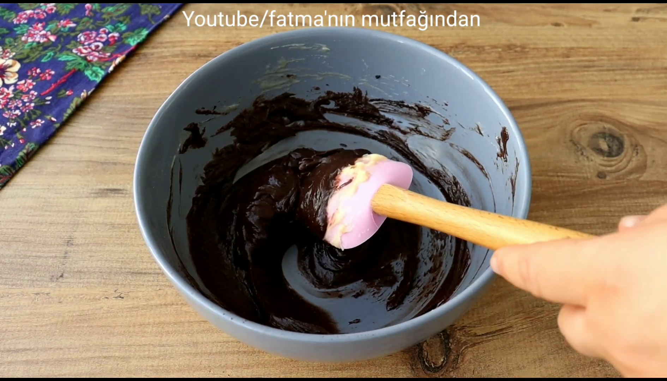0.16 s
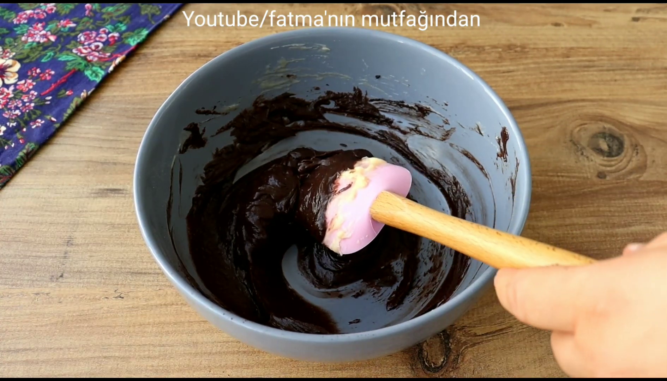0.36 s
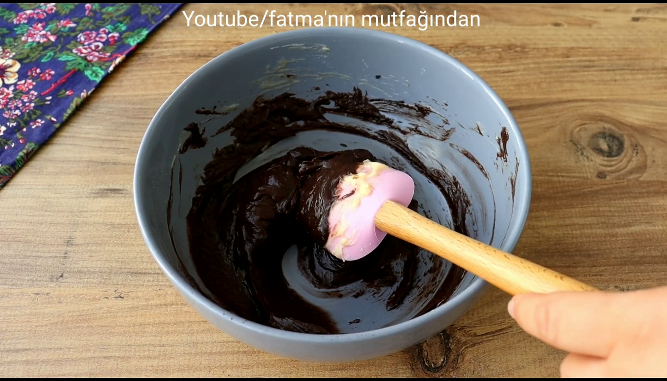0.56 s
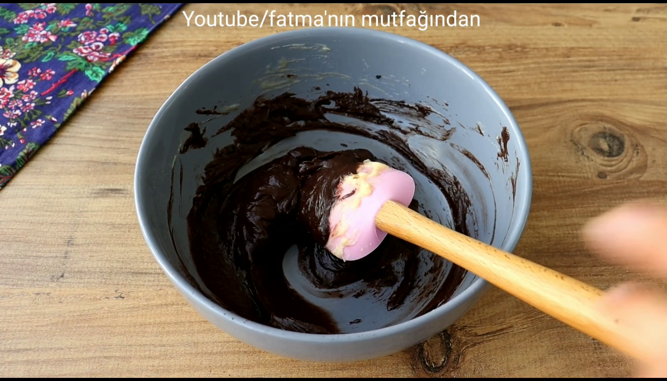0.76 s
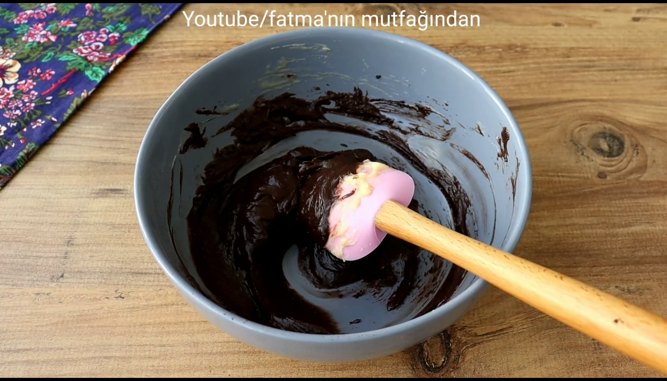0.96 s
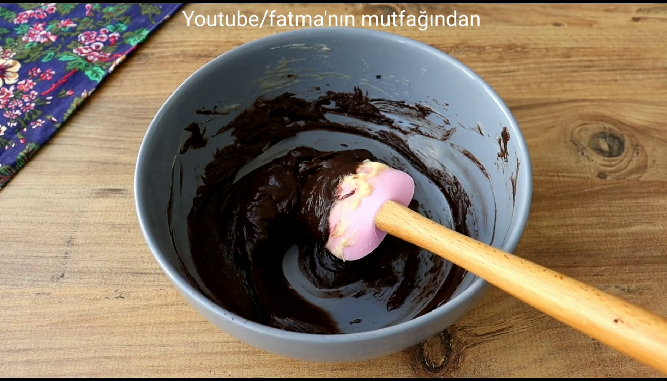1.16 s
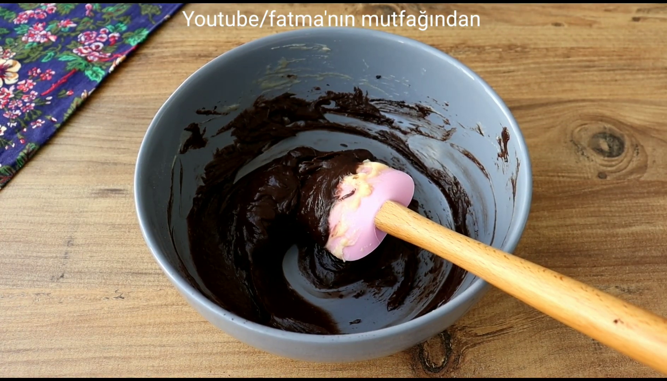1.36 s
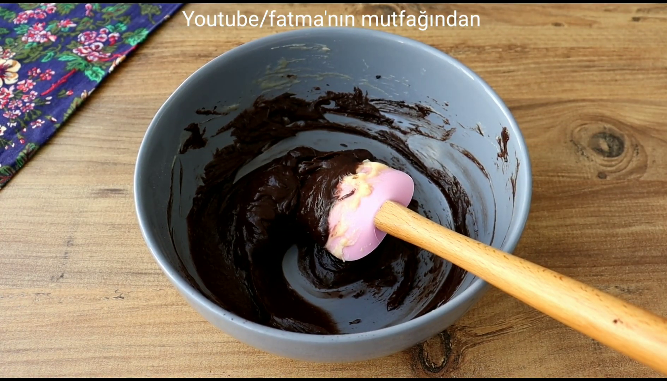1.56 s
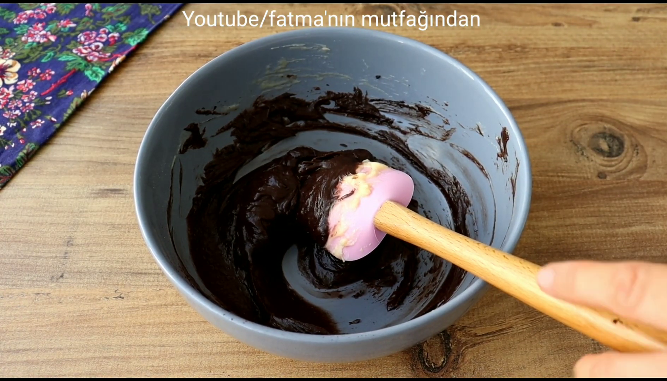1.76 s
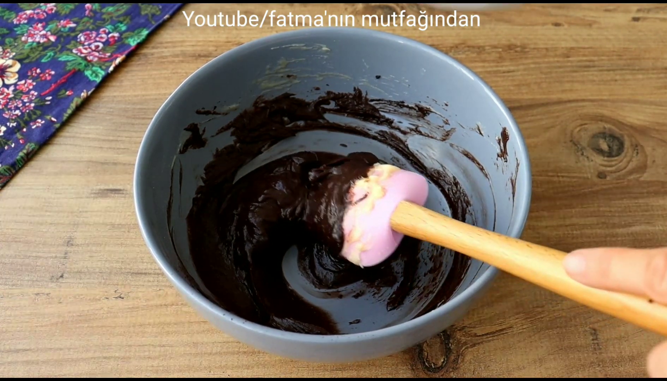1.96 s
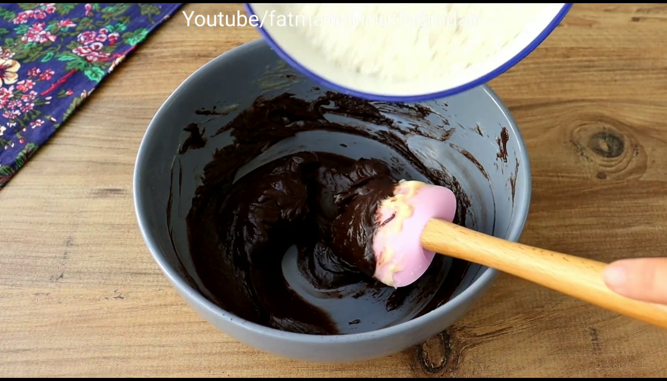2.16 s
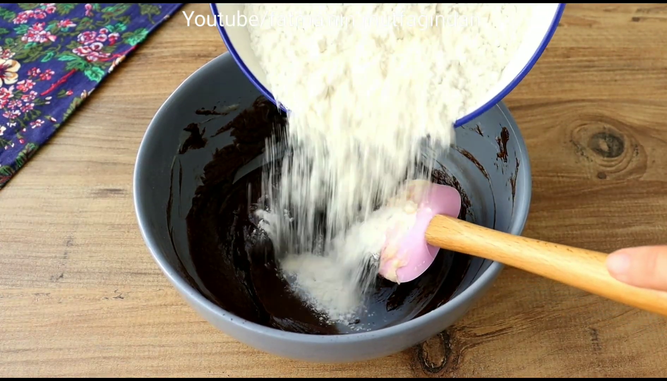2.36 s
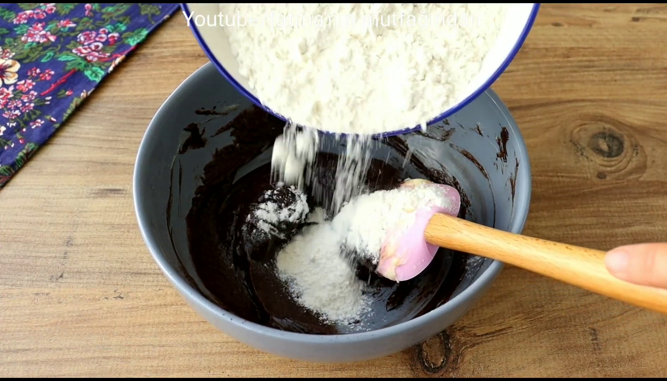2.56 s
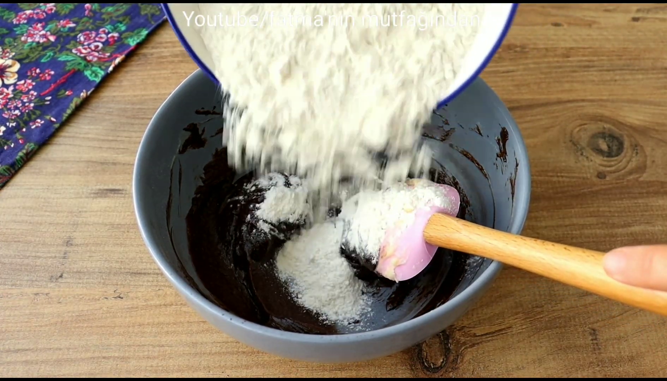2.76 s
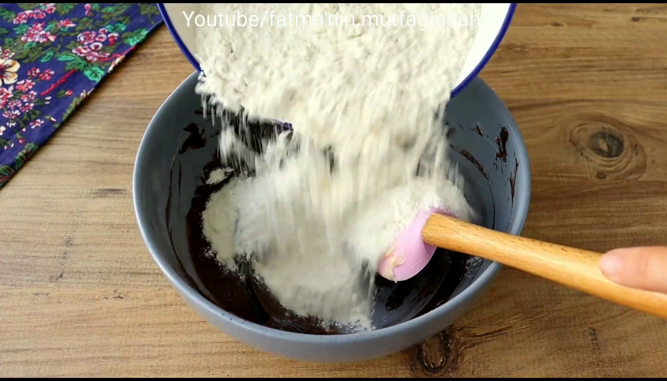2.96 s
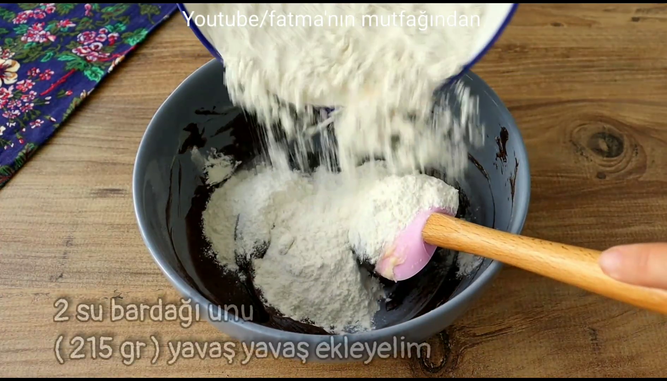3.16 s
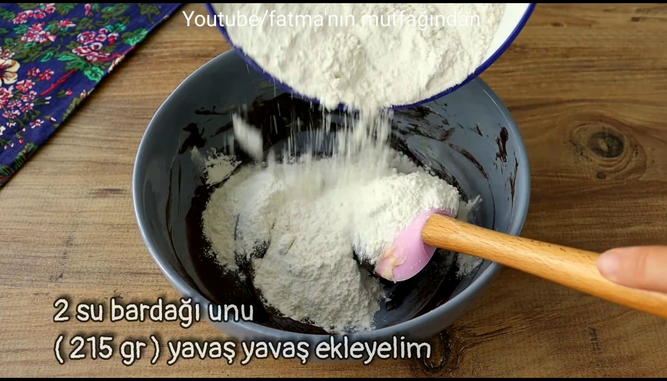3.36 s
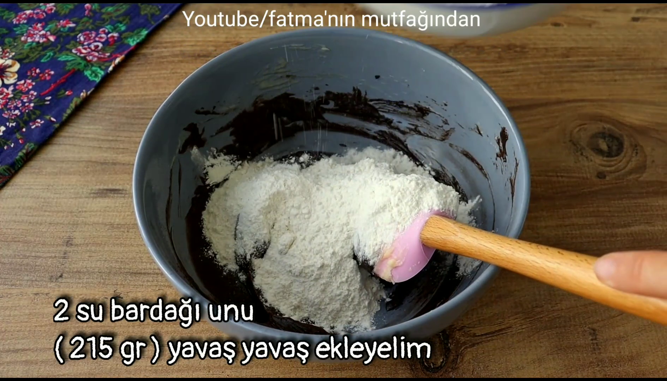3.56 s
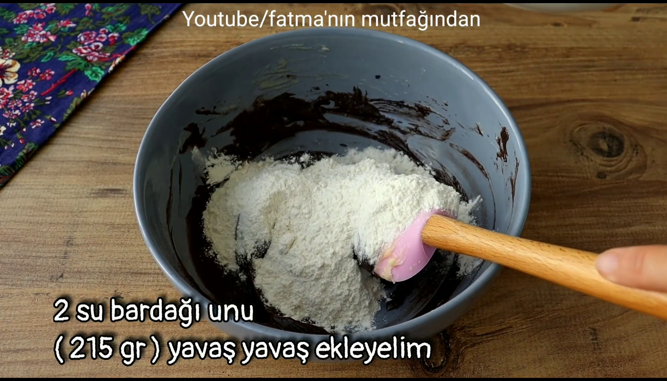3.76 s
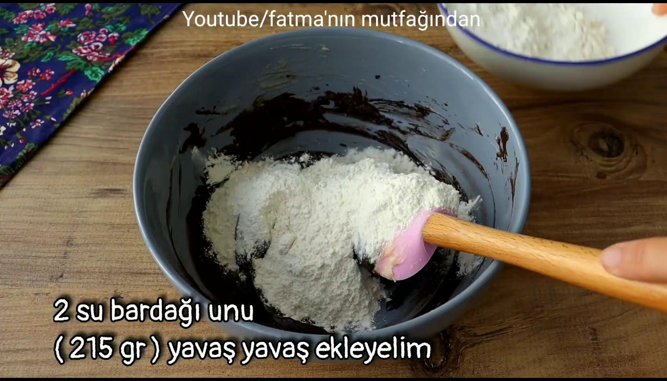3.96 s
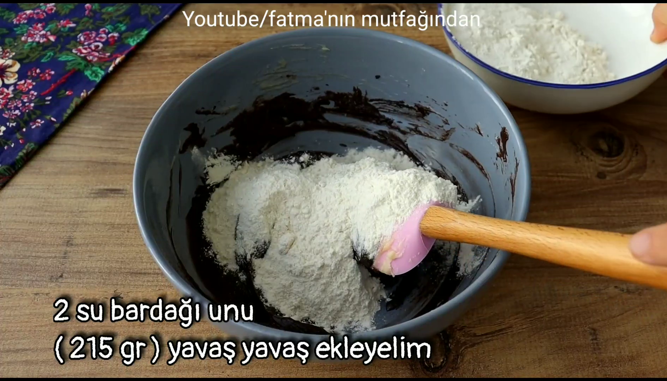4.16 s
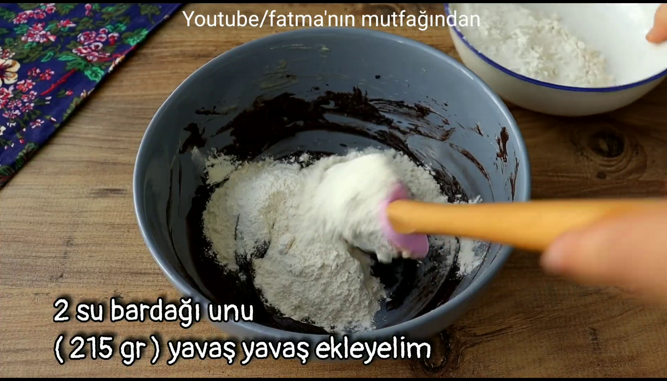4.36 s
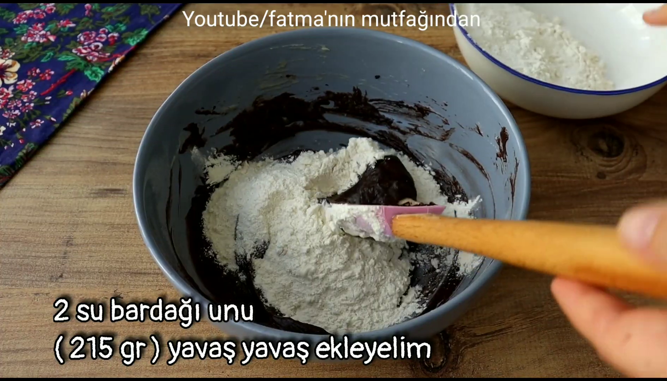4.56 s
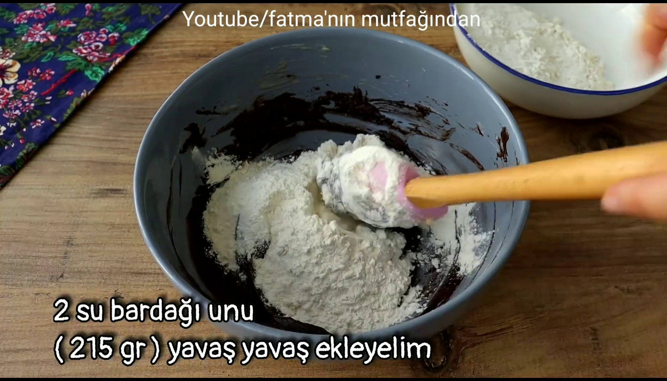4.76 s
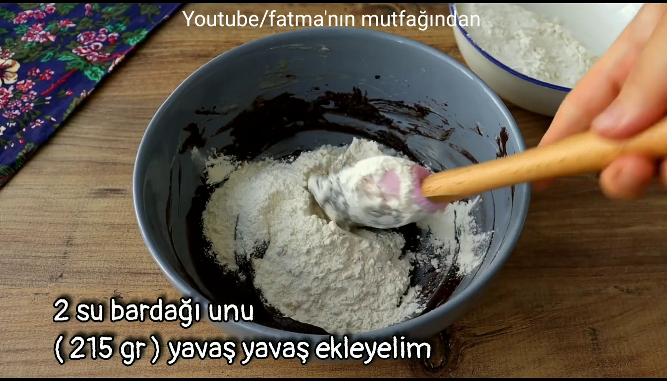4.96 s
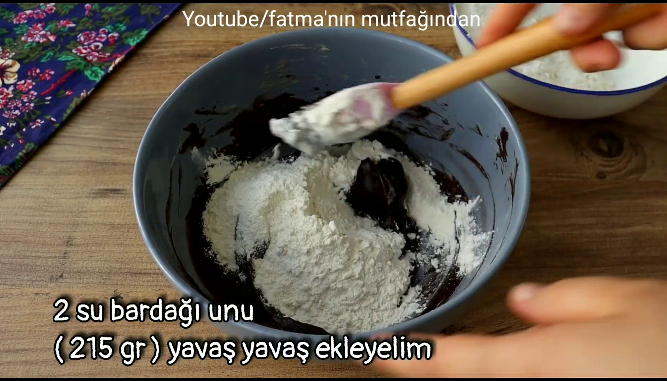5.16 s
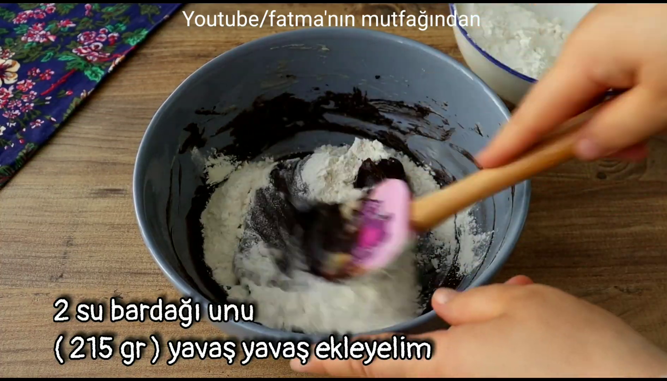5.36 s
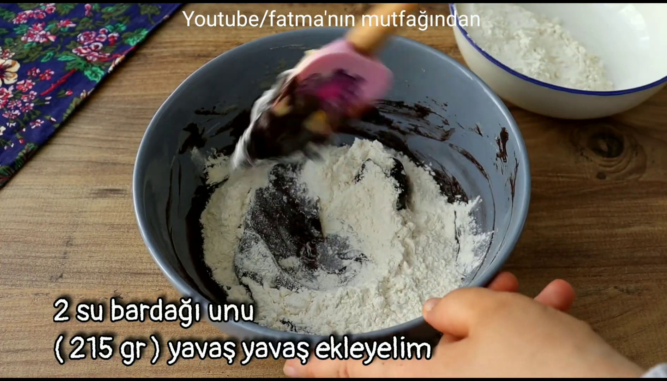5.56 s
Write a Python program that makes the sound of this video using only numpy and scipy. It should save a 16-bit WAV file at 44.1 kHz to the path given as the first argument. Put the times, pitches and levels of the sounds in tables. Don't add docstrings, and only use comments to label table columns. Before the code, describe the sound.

Ceramic bowls and a lid knock lightly on a wooden kitchen counter, then a heavy thump and a hard dish landing with bright cutlery jingle.

```python
import sys
import numpy as np
from scipy import signal
from scipy.fft import rfft, irfft
from scipy.io import wavfile

SR = 44100
rng = np.random.default_rng(int(sys.argv[2]) if len(sys.argv) > 2 else 0)


def invert_db(x):
    u = np.asarray(x, float) / 20
    return 10 ** u


def store_pcm(level_fs):
    pcm = np.round(np.clip(level_fs, -1, 1) * 32767).astype(np.int16)
    wavfile.write(sys.argv[1], SR, np.atleast_2d(pcm).T)


N = 250929

# (frequency [Hz], level [dB per Hz])
SOFT_CONTACT = [(40, -34), (113, -32.5), (284, 1), (420, -7), (700, -23), (1800, -33), (5000, -58),
                (15000, -97)]
# (frequency [Hz], level [dB], t60 [s])
SPOON_MODES = [(4670, 0.0065, 0.18)]


def rms_one(x):
    return x / np.sqrt(np.mean(x ** 2) + 1e-20)


def at_hz(points, hz):
    table_hz, value = np.transpose(points)
    return np.interp(np.log(hz), np.log(table_hz), value)


def drift(rate_hz):
    r = np.exp(-2 * np.pi * rate_hz * 40 / SR)
    draws = rng.standard_normal(N // 40 + 2002)
    slow = rms_one(signal.lfilter([1], [1, -2 * r, r * r], draws)[2000:])
    return np.interp(np.arange(N) / 40, np.arange(len(slow)), slow)


def bands(size, likeness):
    edges = 22 * 2 ** np.arange(0, 9.8, .5)
    settle = 8000
    white = rng.standard_normal((2, 2, size + settle))
    for k, (low, high) in enumerate(zip(edges, edges[1:])):
        band_filter = signal.butter(2, [low, high], "band", fs=SR, output="sos")
        mid, side = signal.sosfilt(band_filter, white[k % 2])[:, settle:]
        hz = np.sqrt(low * high)
        alike = np.clip(at_hz(likeness, hz), -1, 1)
        yield hz, np.sqrt(1 + alike) * mid + np.sqrt(1 - alike) * side * [[1], [-1]]


def sides(pan_db):
    return invert_db(np.array([[.5], [-.5]]) * pan_db)


def hum():
    # (time [s], level [dB])
    swell = [(0.0, -67.5), (0.52, -67), (0.84, -62), (1.28, -66.5), (1.74, -67), (3.33, -64), (3.42, -62),
             (3.82, -61.5), (4.48, -56.5), (4.98, -57.5), (5.39, -57), (5.69, -60)]
    # (level at mean swell [dB], share of the swell followed [-])
    hum_layers = [(-75.5, 0.01), (-58.5, 0.72), (-62, 1.04), (-65.5, 0.77), (-76, 0.059)]
    # (frequency [Hz], level [dB per Hz])
    rumble = [(15, -49), (25, -32), (48, -15), (75, -20.5), (142, -3), (178, -1), (257, -2.5), (393, -9),
              (477, -1), (525, -8), (715, -9.5), (850, -4.5), (2500, -15), (3250, -50), (5500, -120)]
    # (frequency [Hz], level [dB per Hz])
    hiss = [(710, -30), (1200, 0), (1660, -3.5), (1980, -6.5), (2510, -8), (3430, -12), (5300, -20.5),
            (9110, -28), (14500, -26), (15300, -31), (16000, -39)]
    # (frequency [Hz], likeness [-])
    hum_likeness = [(60, 1), (130, 1), (290, 0.9), (640, 0.67), (1410, 0.24), (3100, -0.19), (6820, -0.047),
                    (15000, -0.18)]
    # (frequency [Hz], level [dB])
    hum_balance = [(60, -3.5), (110, 6.5), (200, -0.5), (380, 2), (700, 2.5), (1290, 1.5), (2380, 1.5),
                   (4400, 0.5), (8120, 1), (15000, -4)]

    swell_db = np.interp(np.arange(N) / SR, *np.transpose(swell))
    swell_db -= swell_db.mean()
    together = drift(4.7)
    layers = np.zeros((5, 2, N))
    for hz, band in bands(N, hum_likeness):
        k = np.searchsorted([100, 650, 1500, 5000], hz)
        colour_db = at_hz(hiss if k >= 3 else rumble, hz)
        colour_db = colour_db + 0.27 * together + 1.18 * drift(9)
        layers[k] += band * sides(at_hz(hum_balance, hz)) * invert_db(colour_db)
    layers[0] *= invert_db(1.2 * drift(0.86))

    whine = signal.lfilter(*signal.iirpeak(12400, 8.0, SR), rng.standard_normal((2, N)))
    heard = invert_db(-85.5) * rms_one(whine)
    for (db, share), layer in zip(hum_layers, layers):
        heard += invert_db(db + share * swell_db) * rms_one(layer)
    return heard


def kitchen(build_s=0.00067):
    # (frequency [Hz], t60 [s])
    room_t60 = [(100, 0.84), (300, 0.37), (1000, 0.44), (3000, 0.39), (8000, 0.25), (15000, 0.2)]
    # (frequency [Hz], likeness [-])
    room_likeness = [(60, 0.97), (130, 0.95), (290, 1), (640, 0.6), (1410, 0.21), (3100, -0.33),
                     (6820, -0.014), (15000, -0.42)]
    t = np.arange(SR // 2) / SR
    tail = np.zeros((2, len(t)))
    for hz, band in bands(len(t), room_likeness):
        tail += band * invert_db(-60 * t / at_hz(room_t60, hz))
    tail *= 1 - np.exp(-(t / build_s) ** 2)
    return tail / np.sqrt(np.sum(tail ** 2) / 2)


def pulse(spectrum, size=4096):
    hz = np.maximum(np.fft.rfftfreq(size, 1 / SR), 10)
    cepstrum = irfft(at_hz(spectrum, hz) * np.log(10) / 20)
    cepstrum[1:size // 2] *= 2
    cepstrum[size // 2 + 1:] = 0
    shape = irfft(np.exp(rfft(cepstrum)))
    return shape / np.abs(shape).max()


def ringing(modes, ring_db, chatter_ms, held_s, chance):
    t = np.arange(SR // 2) / SR
    ring = np.zeros(len(t))
    for (hz, db, t60), c in zip(modes, chance):
        level_db = db + ring_db + np.clip(c, -2, 2)
        ring += invert_db(level_db - 60 * t / t60) * np.sin(2 * np.pi * hz * t)
    stilled = np.exp(-np.maximum(t - held_s, 0) / .012)
    return ring * (1 - np.exp(-t * 1000 / chatter_ms)) * stilled


def touching(contact, chatter_ms, chance):
    t = np.arange(2000) / SR
    chatter = chance * np.exp(-t * 2000 / chatter_ms)
    chatter[0] = -3.0
    touches = signal.fftconvolve(contact, chatter)
    return touches / np.abs(touches).max()


def at_ports(near, pan_db):
    t = np.arange(len(near)) / SR
    lag = pan_db * .6 / SR
    ports = [np.interp(t - max(late, 0), t, near, left=0) for late in (-lag, lag)]
    return ports * sides(pan_db)


def blows(table, spectrum, modes, pan_db, held_s=.45):
    out = np.zeros((2, N + SR))
    room = kitchen()
    contact = pulse(spectrum)
    for s, peak_db, ring_db, room_db, chatter_ms in table:
        chance = rng.normal(0, 1, 2030)
        near = ringing(modes, ring_db, chatter_ms, held_s, chance[:30])
        touches = touching(contact, chatter_ms, chance[30:])
        near[:len(touches)] += touches
        heard = invert_db(room_db) * signal.fftconvolve(room, near[None], axes=1)
        heard[:, :len(near)] += at_ports(near, pan_db)
        at = round(s * SR)
        out[:, at:at + heard.shape[1]] += invert_db(peak_db + 1.5) * heard
    return out[:, :N]


def flour():
    # (time [s], peak [dB], ring [dB], room [dB], chatter [ms])
    clumps = [
        (2.754, -56, -60, -6, 0.91),
        (2.841, -52, -60, -4, 1.3),
        (2.934, -50, -60, -5, 3.5),
        (2.955, -49, -60, -2, 3),
        (3.021, -48.5, -60, -5, 1.5),
        (3.036, -55, -60, -4, 1.8),
    ]
    return blows(clumps, SOFT_CONTACT, SPOON_MODES, pan_db=1.1)


def spoon():
    # (time [s], peak [dB], ring [dB], room [dB], chatter [ms])
    pips = [
        (1.772, -56, -58, 4, 4.5),
        (4.480, -55, -60, -8, 6.0),
        (5.158, -57, -57, -15, 4.0),
    ]
    # (time [s], peak [dB], ring [dB], room [dB], chatter [ms])
    pings = [
        (.936, -64, 0.1, 0, 3.0),
    ]
    # (frequency [Hz], level [dB per Hz])
    tap = [(2000, -9), (3600, -7), (4300, -2), (5000, -10), (8000, -48)]
    return blows(pips, tap, SPOON_MODES, pan_db=-4.0) + blows(pings, tap, SPOON_MODES, pan_db=0.1)


def glass():
    # (time [s], peak [dB], ring [dB], room [dB], chatter [ms])
    ticks = [
        (2.1055, -43.5, -60, -10, .6),
        (3.696, -58, -60, -14, 6.1),
        (4.206, -37.5, -60, -11, 3.7),
    ]
    # (time [s], peak [dB], ring [dB], room [dB], chatter [ms])
    clinks = [
        (4.737, -53.5, -1.5, -10, 1.7),
    ]
    # (frequency [Hz], level [dB per Hz])
    tick = [(1500, -60), (4000, 10), (8000, 18), (13000, 9), (16500, 18), (19000, -30)]
    # (frequency [Hz], level [dB], t60 [s])
    glass_modes = [(2780, -6.5, 0.26), (4093, -10, 0.38), (4100, -13, 0.2), (5563, -0.5, 0.13),
                   (7320, -7, 0.34), (9000, -11, 0.19), (9250, -12, .18), (11700, -16, .12),
                   (13300, -10, .12), (14500, -14, .12)]
    dry_ticks = blows(ticks, tick, glass_modes, pan_db=-1.1)
    return dry_ticks + blows(clinks, tick, glass_modes, pan_db=-1.6, held_s=0.068)


def snap_and_lid():
    # (time [s], peak [dB], ring [dB], room [dB], chatter [ms])
    clacks = [
        (.711, -32.5, -15, 1.5, 5.9),
        (.733, -36, -20, 0.5, 12.3),
        (.890, -43.5, -5, 0.5, 12),
        (.912, -42.5, -11, 0.5, 14),
    ]
    # (time [s], peak [dB], ring [dB], room [dB], chatter [ms])
    snaps = [
        (.5402, -30.5, -32, -4.5, 6.6),
        (.549, -40.5, -60, -20, 11),
        (.556, -37, -60, -16, 6.5),
    ]
    # (frequency [Hz], level [dB per Hz])
    clack = [(350, -38), (600, 1), (879, -16), (1320, 2), (1990, -12), (2430, 2.5), (3040, -5.5),
             (4880, -12.5), (5350, -19), (14000, -42.5)]
    # (frequency [Hz], level [dB per Hz])
    snap = [(290, -52), (500, -9), (781, -8.5), (1310, -6.5), (1570, -11), (1710, -6.5), (3240, 1),
            (5280, -14.5), (14000, -38)]
    # (frequency [Hz], level [dB], t60 [s])
    lid_modes = [(2498, -3, 0.083), (2440, 5, 0.096), (2600, -6, 0.05), (3300, -7, .05), (3600, -5, 0.058),
                 (4500, -13, 0.05), (4940, -6, 0.088), (7950, -26, .04)]
    return blows(clacks, clack, lid_modes, pan_db=-5.0) + blows(snaps, snap, lid_modes, pan_db=4.0)


def slides():
    # (time [s], push [s], peak [dB], fade [dB per s], brightness [dB])
    pushes = [
        (.884, 0.025, -57.5, 59, 0.5),
        (1.289, 0.052, -67.5, 153, 7.5),
        (1.459, 0.036, -56, 500, 4.5),
        (3.27, 0.051, -38.5, 92.5, -6.5),
        (4.8, 0.094, -61.5, 40, -12),
        (5.0, .09, -85.5, 250, 19.5),
    ]
    # (frequency [Hz], level [dB per Hz])
    grit_colour = [(35, -30), (60, -35), (135, -9.5), (295, -14), (364, -11), (503, -16), (711, -12.5),
                   (1330, -17), (1830, -15), (2150, -16.5), (3120, -17), (5680, -27), (10900, -34),
                   (15000, -41)]
    push_power = 0.54
    dulling, top_dulling = 0.18, 2.2

    grain_db = 3.76 * np.minimum(rng.exponential(1, N), 5)
    grains = (rng.random(N) < 7000 / SR) * invert_db(grain_db) * rng.choice([-1, 1], N)
    grit = rms_one(signal.fftconvolve(grains, pulse(grit_colour))[:N])
    low, wide = (signal.filtfilt(*signal.butter(1, hz, fs=SR), grit) for hz in (3500, 8000))

    out = np.zeros(N)
    t = np.arange(N) / SR
    for s, push_s, peak_db, fade_db, bright_db in pushes:
        swell = np.clip((t - s) / push_s, 0, 1) ** push_power
        speed = swell * invert_db(-fade_db * np.maximum(t - s - push_s, 0))
        bright = speed ** dulling * (wide - low) + speed ** top_dulling * (grit - wide)
        out += invert_db(peak_db) * speed * (low + invert_db(bright_db) * bright)
    echo = signal.fftconvolve(kitchen(), out[None], axes=1)[:, :N]
    return out * sides(4.8) + invert_db(-1.5) * echo


def bowl():
    # (time [s], peak [dB], ring [dB], room [dB], chatter [ms])
    knocks = [
        (.6350, -32, -10.5, 2, 6.1),
        (.657, -31, -16, -3.5, 9.4),
    ]
    # (time [s], peak [dB], ring [dB], room [dB], chatter [ms])
    rim_knocks = [
        (2.2445, -36.5, -6, -5.5, 3.4),
        (2.255, -34.5, -50, 1, 3.6),
        (2.283, -36, -48, -7.5, 6.5),
    ]
    # (frequency [Hz], level [dB per Hz])
    knock = [(60, -65), (120, -7.5), (264, 0), (400, -13.5), (700, -8), (1050, -13.5), (1340, -14),
             (1800, -22), (2290, -26), (3010, -38.5), (12000, -49), (15600, -85)]
    # (frequency [Hz], level [dB], t60 [s])
    body_modes = [(197, -3.5, 0.21), (264.6, -10, 0.4), (562, -2, 0.054), (690, 7, 0.039), (930, -7, .1),
                  (1358, 0.5, 0.21), (1420, -10, 0.12), (1710, -9, 0.12), (2266, -1.5, 0.089),
                  (3450, -20.5, 0.15), (4700, -23, 0.13), (6135, -31, .12), (7840, -29, .2)]
    # (frequency [Hz], level [dB], t60 [s])
    rim_modes = [(176, -6, 0.28), (264, -5, 0.34), (796, -26, 0.15), (1362, -5, 0.35), (1411, -12, 0.73),
                 (1580, -20, 0.15), (1728, -30, 0.13), (2310, -9, 0.34), (3350, -24, 0.16),
                 (4750, -10.5, 0.16), (6100, -24, 0.17), (7730, -15, 0.059), (9496, -40, .15)]
    body = blows(knocks, knock, body_modes, pan_db=4.0, held_s=0.1)
    return body + blows(rim_knocks, knock, rim_modes, pan_db=3.5, held_s=.142)


def counter():
    # (time [s], peak [dB], ring [dB], room [dB], chatter [ms])
    thumps = [
        (4.2036, -10, -25.5, -4.5, 0.049),
    ]
    # (time [s], peak [dB], ring [dB], room [dB], chatter [ms])
    landings = [
        (1.467, -47.5, -40, 6, 8),
        (1.488, -36, -40, -5, 2.6),
        (1.501, -35, -40, -8, 4.7),
        (4.2168, -23.5, -8, 3, 0.089),
        (4.272, -26, -43, -1.3, 1.8),
        (4.289, -32, -43, -9, 1.9),
    ]
    # (frequency [Hz], level [dB per Hz])
    thump = [(24, -39), (60, -33), (150, -20), (280, 5), (450, 0), (750, -8), (1100, -15.5), (1800, -20.5),
             (3500, -28.5), (6600, -36.5), (10000, -71), (15000, -68)]
    # (frequency [Hz], level [dB], t60 [s])
    wood_modes = [(182.3, -14, 0.92), (248, -2.5, 0.19), (352, -23, 0.13), (502, -27, 0.063),
                  (760, -22, .15), (950, -29, 0.14)]
    # (frequency [Hz], level [dB], t60 [s])
    crockery_modes = [(7720, -36, .35), (10570, -45, 0.23), (4460, -46, .15)]
    thumped = blows(thumps, thump, wood_modes, pan_db=4.5)
    return thumped + blows(landings, SOFT_CONTACT, crockery_modes, pan_db=0.5)


def dish():
    # (time [s], peak [dB], ring [dB], room [dB], chatter [ms])
    slams = [
        (4.5227, -9, -30, 5, .05),
        (4.5233, -11, -40, -20, .05),
    ]
    # (time [s], peak [dB], ring [dB], room [dB], chatter [ms])
    tings = [
        (4.5258, -18.5, -17, -28, 1.9),
        (4.529, -27, -22, -22, 2.4),
    ]
    # (frequency [Hz], level [dB per Hz])
    slam = [(24, -60), (130, -17.5), (241, 8), (496, 6), (548, 6), (653, 8), (949, 0.5), (2390, -1),
            (4130, -14.5), (7910, -21.5), (9650, -31), (12400, -100), (15500, -81)]
    # (frequency [Hz], level [dB per Hz])
    ting = [(4000, -7), (6500, 9), (8500, 4), (10500, -10), (12200, 15), (13600, -4), (15000, -15)]
    # (frequency [Hz], level [dB], t60 [s])
    dish_modes = [(319, -3.5, 0.2), (480, 0, 0.093), (1093, -14, 0.45), (1550, -14, .15), (2091, -32, 0.13),
                  (3250, -30, 0.13)]
    # (frequency [Hz], level [dB], t60 [s])
    cutlery_modes = [(8800, -19, .15), (9200, -23, .15), (10300, -17, 0.18), (10750, -21, .15),
                     (12200, -14, 0.18), (11920, -8.5, 0.22), (11980, -9, 0.21), (12540, -15, .17),
                     (12000, -20, .2), (12800, -20, 0.18), (12700, -2, 0.071), (13450, -14, 0.07),
                     (13630, -17, 0.063)]
    return blows(slams, slam, dish_modes, pan_db=-2.0) + blows(tings, ting, cutlery_modes, pan_db=-4.5)


def scene():
    no_bass = signal.butter(4, 130, "high", fs=SR, output="sos")
    light = signal.sosfilt(no_bass, spoon() + glass() + snap_and_lid() + bowl())
    return hum() + flour() + light + slides() + counter() + dish()


def roll_off(x):
    return signal.sosfilt(signal.butter(12, 16480, fs=SR, output="sos"), x)


def record(dry):
    rounded = .42 * np.tanh(dry / .42)
    top_cut = signal.cheby2(8, 24, 15800, fs=SR, output="sos")
    mix = signal.sosfilt(top_cut, rounded)
    return roll_off(mix)


dry = scene()
out = record(dry)
store_pcm(out)
```